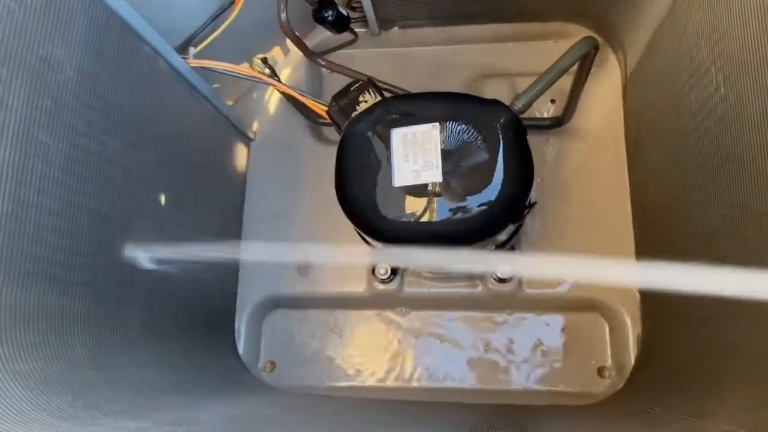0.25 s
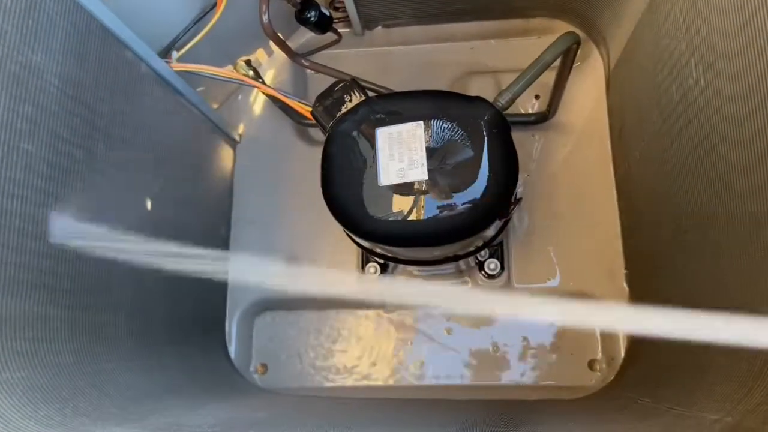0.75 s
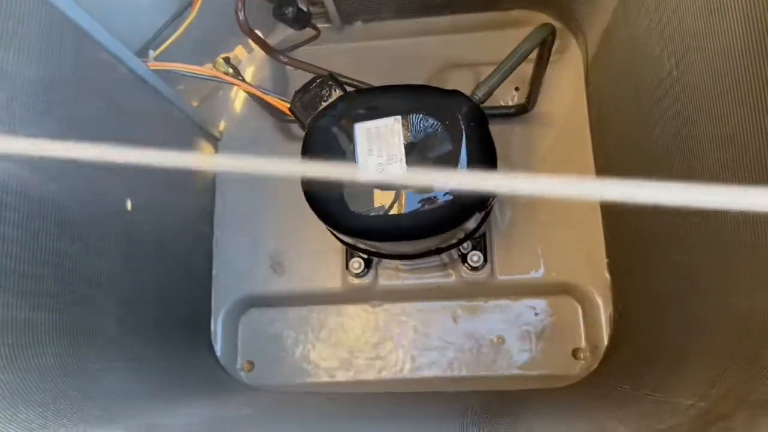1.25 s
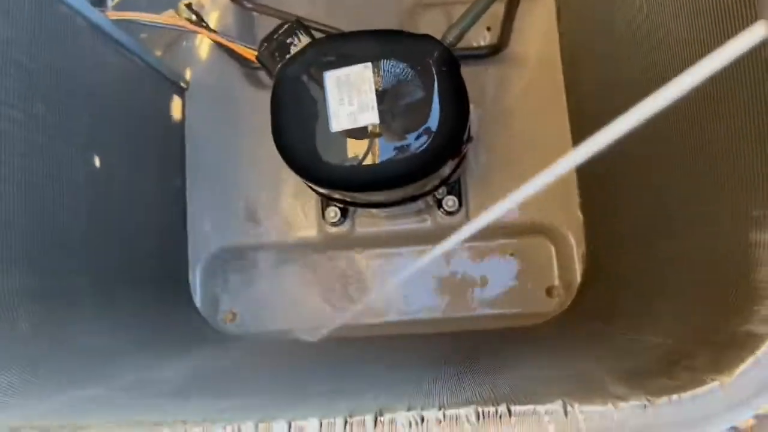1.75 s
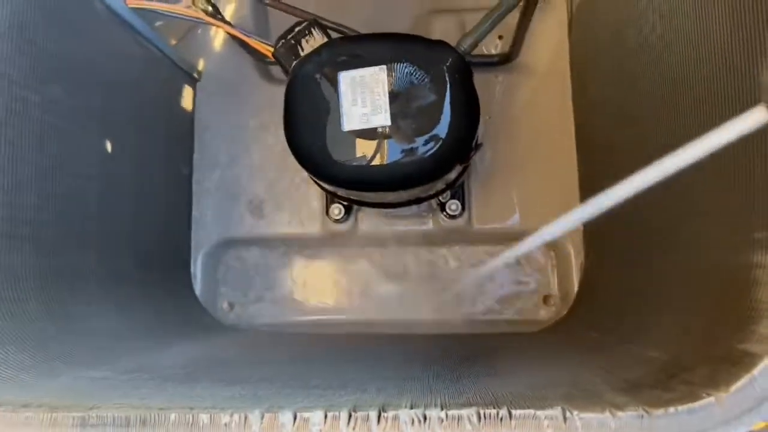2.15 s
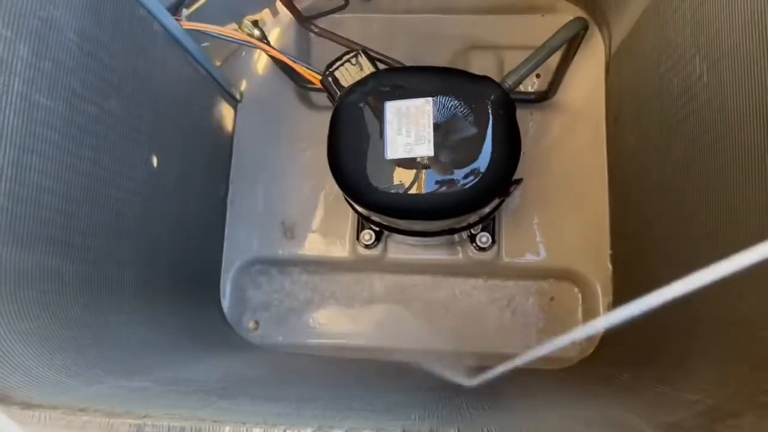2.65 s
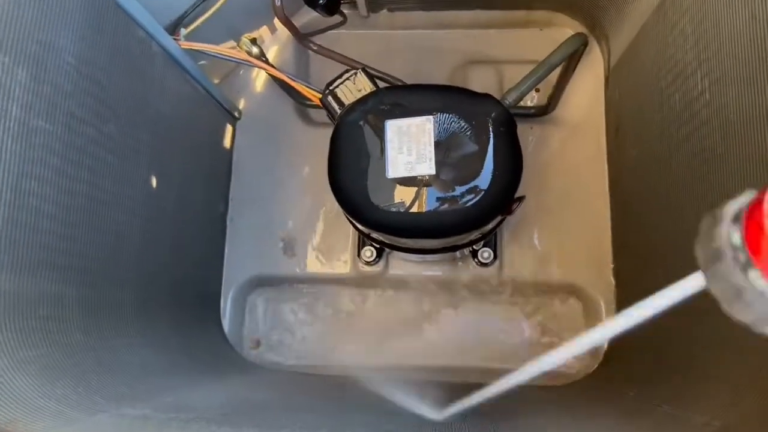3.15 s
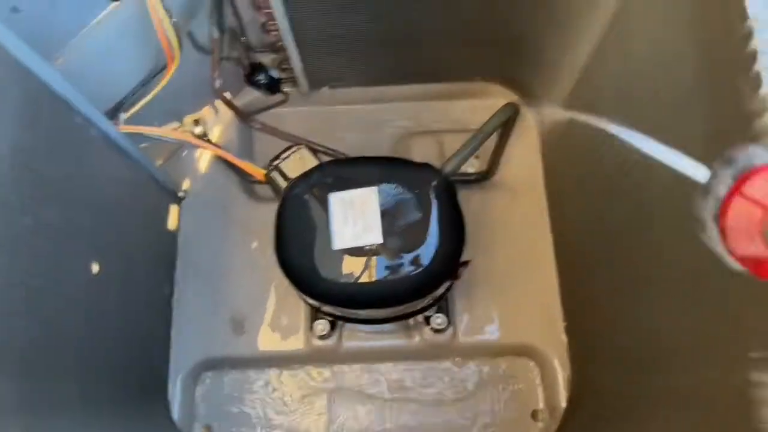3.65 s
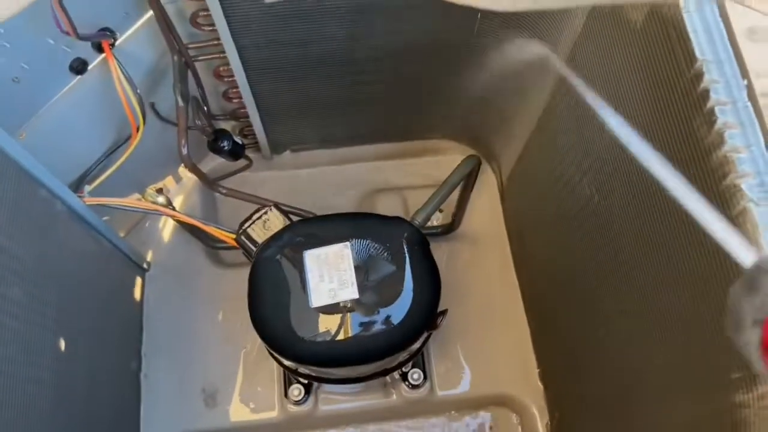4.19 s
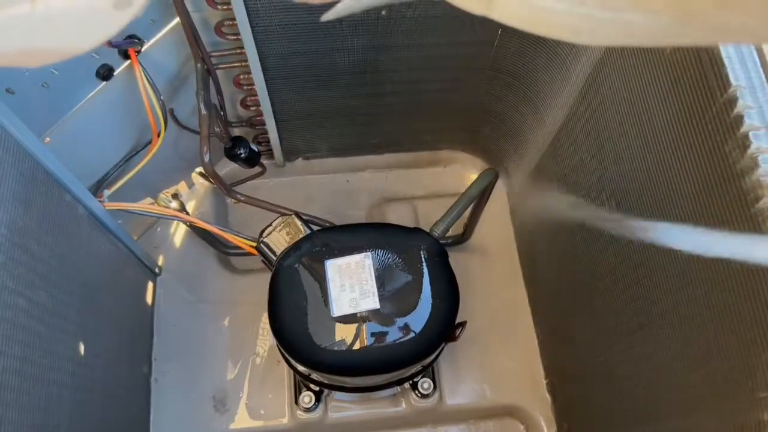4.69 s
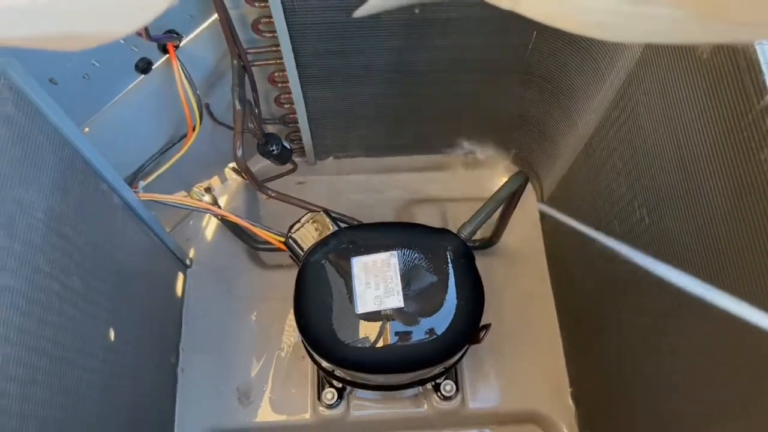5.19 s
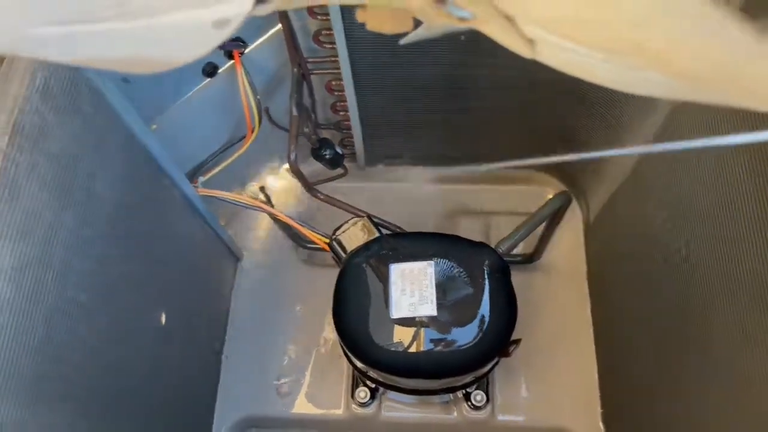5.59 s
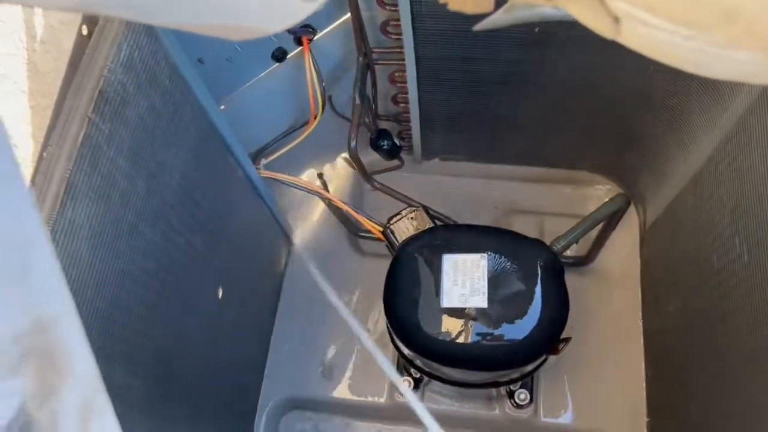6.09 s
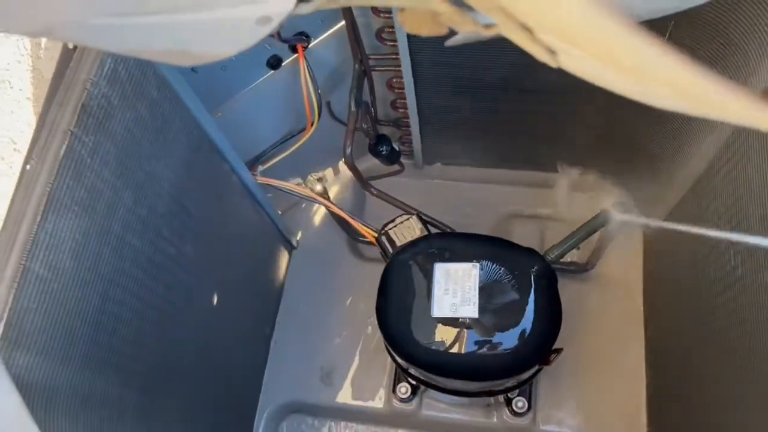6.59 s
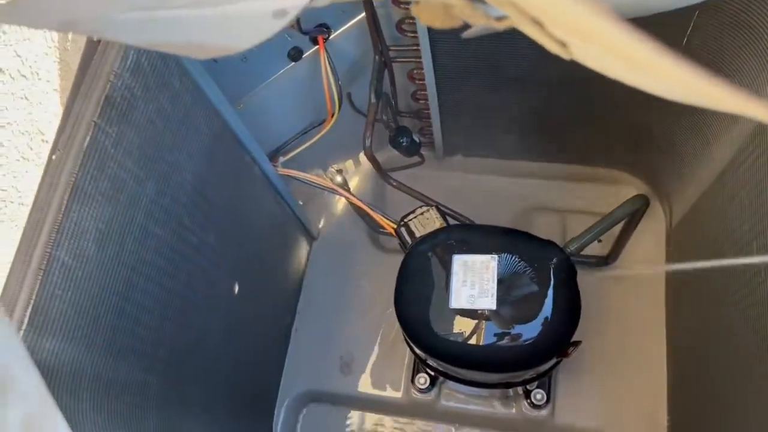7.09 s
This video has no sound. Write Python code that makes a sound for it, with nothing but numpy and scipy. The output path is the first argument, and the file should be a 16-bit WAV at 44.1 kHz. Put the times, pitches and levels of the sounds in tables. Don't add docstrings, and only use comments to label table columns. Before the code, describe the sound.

From 0 to about 1.4 seconds a hose jet sprays thin metal fins close to the microphone: a dense, bright, steady hiss, slightly left, with a lower rush through the gaps. Around 1.5 seconds it drops to a much softer spray, with light flicks against rims near 2.1 and 3.1 seconds and faint whistling resonances. It slowly strengthens from 4 seconds. At 4.9 it strikes solid compressor metal, pipes and pan, becoming much louder, splashy and uneven, with drumming, spatter and very short rings, broken by tiny dropouts near 5.1. After a lull around 5.7, a single low wet knock lands at 5.8. Vigorous sweeping splashes and metallic rings continue, dipping briefly near 6.8 and 7.0, and fade sharply at 7.3. A very faint distant rumble and wavering low hum persist throughout, outdoors.

```python
import sys
import numpy as np
from scipy import signal
from scipy.fft import rfft, irfft, next_fast_len
from scipy.io import wavfile

SR = 44100
rng = np.random.default_rng(int(sys.argv[2]) if len(sys.argv) > 2 else 0)


def output_pcm(signal):
    pcm = np.clip(np.atleast_2d(signal).T, -1, 1) * 32767
    wavfile.write(sys.argv[1], SR, np.round(pcm).astype(np.int16))


def attenuation_scalar(level_db):
    decades = np.asarray(level_db, float) / 20
    return 10 ** decades


N = 323694

# frequency in Hz, level in dB per Hz.
SPLASH_SPECTRUM = [(760, -113), (1300, 2), (1890, 3.5), (2360, 7), (2880, -2), (3560, 4.5), (7480, -11),
                   (10000, -48), (13000, -46), (22000, -120)]
# frequency in Hz, likeness from -1 to 1.
SPRAY_LIKENESS = [(60, 1), (180, 0.99), (550, 1), (1650, 0.29), (4970, 0.37), (15000, 0.25)]
# frequency in Hz, likeness from -1 to 1.
METAL_LIKENESS = [(60, 1.0), (180, 0.73), (550, 1), (1650, 0.34), (4970, 0.53), (15000, 0.03)]


def rms_one(x):
    return x / np.sqrt(np.mean(x ** 2) + 1e-20)


def in_time(rows):
    s, *columns = np.transpose(rows)
    return [np.interp(np.arange(N) / SR, s, c) for c in columns]


def at_hz(points, hz):
    table_hz, value = np.transpose(points)
    return np.interp(np.log(hz), np.log(table_hz), value)


def drift(depth_db, rate):
    r = np.exp(-80 * np.pi * rate / SR)
    slow = signal.lfilter([1], [1, -2 * r, r * r], rng.standard_normal(N // 40 + 2002))
    slow = slow[2000:]
    return np.interp(np.arange(N) / 40, np.arange(len(slow)), attenuation_scalar(depth_db * rms_one(slow)))


def stereo(pair, likeness, hz):
    alike = np.clip(at_hz(likeness, hz), -0.99, 0.99)
    return np.sqrt(1 + alike) * pair[0] + np.sqrt(1 - alike) * pair[1] * [[1], [-1]]


def panned(x, pan_db):
    return x * attenuation_scalar(pan_db / 2 * np.array([[1], [-1]]))


def coloured(source, spectrum, likeness, patchy_db, rate):
    low_hz, top_hz = spectrum[0][0], spectrum[-1][0]
    edges = np.geomspace(low_hz, top_hz, round(3 * np.log2(top_hz / low_hz)) + 1)
    out = 0
    for k, (low, high) in enumerate(zip(edges, edges[1:])):
        band = signal.butter(2, [low, high], "band", fs=SR, output="sos")
        pair = signal.sosfilt(band, source[k % 2])
        hz = np.sqrt(low * high)
        out = out + attenuation_scalar(at_hz(spectrum, hz)) * drift(patchy_db, rate) * stereo(pair, likeness, hz)
    return rms_one(out)


def mode(x, hz, width):
    r = np.exp(-np.pi * width / SR)
    return signal.lfilter([1 - r * r, 0, r * r - 1], [2, -4 * r * np.cos(2 * np.pi * hz / SR), 2 * r * r], x)


def resonant(source, modes, likeness, wander_db, rate):
    out = 0
    for k, (hz, width, db) in enumerate(modes):
        fed = source[k % 2] * (drift(wander_db, rate) * attenuation_scalar(db) / np.sqrt(width))
        out = out + stereo(mode(fed, hz, width), likeness, hz)
    return rms_one(out)


def drops(per_s, spread_db):
    sizes = attenuation_scalar(spread_db * np.minimum(rng.exponential(1, (2, 2, N)), 5)) * rng.standard_normal((2, 2, N))
    return sizes * (rng.random((2, 2, N)) < per_s / SR) + 1e-18


def spurts(per_s, decay_s, size):
    landing = size * np.minimum(rng.exponential(1, N), 2) * (rng.random(N) < per_s / SR)
    return rms_one(1 + signal.lfilter([1], [1, -np.exp(-1 / (decay_s * SR))], landing))


def surroundings():
    # frequency in Hz, level in dB per Hz.
    far_spectrum = [(30, -40), (50, -35), (65, -40), (80, -16), (100, 1), (125, -5.5), (160, 0.5),
                    (200, -6.5), (265, -12), (310, -14.5), (400, -9), (500, -8), (1000, -10.5), (1900, -13)]
    # time in seconds, level in dB.
    far_swell = [
        (0.0, -50),
        (1.9, -52.5),
        (6.03, -48),
        (7.34, -50),
    ]
    # frequency in Hz, width in Hz, level in dB.
    hum_modes = [(119.3, 6.1, 25.1), (262.4, 4.2, 17.2)]
    air = rng.standard_normal((2, 2, N))
    rumble = coloured(air, far_spectrum, SPRAY_LIKENESS, patchy_db=1.47, rate=2.8)
    hum = resonant(air, hum_modes, SPRAY_LIKENESS, wander_db=2.5, rate=1.3)
    return attenuation_scalar(in_time(far_swell)[0]) * (rumble + attenuation_scalar(-7) * hum)


def slap():
    start_s, level_db, top_hz, decay_s = 5.7855, -19, 1800, 0.007
    age = np.arange(N) / SR - start_s
    burst = rng.standard_normal(N) * (age > 0) * np.exp(-np.abs(age) / decay_s) + 1e-18
    knock = signal.sosfilt(signal.butter(2, [340, top_hz], "band", fs=SR, output="sos"), burst)
    return attenuation_scalar(level_db) * knock / np.sqrt(top_hz / SR * 2)


def breaks_db():
    # deepest point in seconds, length in seconds, loss in dB (negative: a brief surge).
    breaks = [(0.044, 0.027, 0.5), (0.15, 0.037, 2), (0.189, 0.019, -0.5), (0.408, 0.021, -2.5),
              (.58, .04, 0.5), (0.615, .03, 0.5), (0.726, .04, -0.5), (.9, .03, -1.5), (0.972, 0.023, -0.5),
              (1.012, .05, 1), (1.25, .03, 0.5), (0.373, 0.062, 2), (0.677, 0.042, 2.5),
              (0.803, 0.044, 3.5), (1.155, 0.028, 4.5), (2.067, .04, 0.5), (2.165, 0.025, -5),
              (2.203, .04, 0), (2.254, 0.015, -4.5), (2.394, 0.052, 3.5), (2.978, 0.062, 3),
              (3.092, 0.051, 6.5), (3.236, 0.04, 6.5), (3.28, 0.063, 6), (3.542, 0.05, 7.5),
              (3.672, 0.033, 2), (3.875, 0.06, 1.5), (4.153, 0.033, 3), (4.572, 0.062, 3.5),
              (4.609, 0.05, 7.5), (4.803, 0.041, 3.5), (4.908, 0.083, 3.5), (5.054, 0.035, 24),
              (5.127, 0.014, 26), (5.282, 0.029, 9), (5.363, 0.015, 9), (5.787, 0.075, 8.5),
              (5.876, 0.092, 7.5), (6.422, 0.14, 8.5), (6.584, 0.098, 6), (6.827, 0.0064, 10),
              (6.856, 0.029, 15), (6.957, 0.041, 3.5), (6.99, 0.02, 11), (7.13, 0.026, 7),
              (7.34, 0.052, 19)]
    snap_back = 0.92
    t = np.arange(0, N + 8, 8) / SR
    loss = 0
    for s, length, loss_db in breaks:
        side_s = np.where(t < s, length, snap_back * length)
        loss = loss + loss_db * np.exp(-(2 * (t - s) / side_s) ** 2)
    return -np.interp(np.arange(N) / SR, t, loss)


def slugs():
    # landing in seconds, gain over the stream.
    landings = [(.177, .3), (.6135, .3), (.6958, 0.27), (.9597, .3), (1.6805, 0.55), (1.729, 0.49),
                (2.4563, 0.61), (3.028, .4), (3.1433, .4), (3.2844, .3), (4.6404, .4), (5.0798, 0.24),
                (5.2225, .4), (5.3163, .3), (5.3841, 0.39), (5.8585, 0.35), (5.9334, 0.19), (6.4422, .3),
                (6.528, .3), (2.1455, 0.88), (2.2383, .5), (2.2518, 0.59), (3.1143, .5), (3.7245, 0.57),
                (4.911, 0.26), (5.1048, 0.29), (5.137, 1.4), (5.233, 0.58), (5.3358, 0.42), (5.43, 0.52),
                (5.604, 0.43), (6.078, 0.3), (6.4059, .15), (6.6059, 0.65), (6.8713, 0.29), (7.0175, 1.2),
                (7.062, 0.32), (7.1726, 0.3), (7.233, 0.34)]
    rise_s, decay_s = 0.0007, 0.006
    s, size = np.transpose(landings)
    hits = np.zeros(N)
    hits[(s * SR).astype(int)] = np.maximum(size, 0)
    rise, decay = np.exp(-1 / (rise_s * SR)), np.exp(-1 / (decay_s * SR))
    return 1 + signal.lfilter([1 - rise], np.convolve([1, -rise], [1, -decay]), hits + 1e-18)


def contacts():
    # start in seconds, dwell in seconds, splash in dB,
    # deep drum in dB over splash, middle drum in dB over splash.
    brushes = [
        (1.005, .19, -45, -14, 0),
        (1.66, .33, -52, -8, 0.5),
        (2.044, 0.013, -37, -19, -5),
        (2.14, 0.045, -40, -17, -0.5),
        (2.239, 0.034, -38.5, -20, 0),
        (3.113, 0.012, -36.5, -35, -7.5),
        (3.5, 0.13, -56, -12, 2.5),
        (3.85, 0.1, -54.5, -15, 4),
        (3.724, 0.015, -33.5, -20, -8),
    ]
    # as for the brushes, in seconds and dB.
    sweep_out = [(4.908, 0.081, -26.5, -22, -4.5), (4.944, 0.1, -26, -10.5, 0.5),
                 (5.062, 0.018, -29.5, 0.5, 2), (5.09, 0.031, -29, -5, 4.5), (5.138, 0.034, -28, -15, -6),
                 (5.18, 0.044, -30.5, -15, 2), (5.224, 0.041, -23, -17.5, -4.5),
                 (5.315, 0.035, -26.5, -18, -3.5), (5.375, 0.054, -28.5, -35, -5),
                 (5.425, 0.053, -33, -10, -0.5), (5.49, 0.068, -29.5, -11, -1),
                 (5.569, 0.072, -27.5, -40, -5.5), (5.66, 0.06, -35.5, -18, -38)]
    # as for the brushes, in seconds and dB.
    sweep_back = [(5.784, 0.042, -17.5, -12.5, -9.5), (5.855, 0.07, -30.5, -17, -5.5),
                  (5.926, 0.085, -22.5, -17, -5.5), (6.02, 0.047, -25.5, -8.5, 0.5),
                  (6.07, 0.033, -23.5, -28, -13), (6.109, 0.05, -23, -10, -9), (6.2, 0.11, -32.5, -9, -15),
                  (6.311, 0.053, -24, -10.5, -7.5), (6.402, 0.044, -25, -36, -11), (6.44, .1, -23, -7, -4),
                  (6.55, 0.025, -26.5, -14, -4), (6.606, .215, -31, -13.5, -2),
                  (6.831, 0.016, -24, -9.5, -2), (6.865, 0.066, -24.5, -6.5, -4.5),
                  (6.954, 0.046, -31, -8, -7.5), (7.019, 0.029, -30.5, -3.5, -2),
                  (7.05, 0.072, -26, -10, -6), (7.163, 0.063, -27.5, -15, -6.5),
                  (7.22, 0.097, -26, -14, -7)]
    attack_s = np.array([[0.006], [0.016], [0.006]])
    release_db_per_s = np.array([[401], [302], [319]])
    out, t = np.zeros((3, N)), np.arange(N) / SR
    for s, dwell, splash_db, deep_db, middle_db in brushes + sweep_out + sweep_back:
        span = slice(int(s * SR), int((s + dwell) * SR) + SR // 4)
        age = t[span] - s
        level_db = splash_db + np.array([[0], [deep_db], [middle_db]])
        level_db = level_db - release_db_per_s * np.maximum(age - dwell, 0)
        swell = np.clip(age / attack_s, 0, 1)
        out[:, span] = np.hypot(out[:, span], swell * attenuation_scalar(level_db))
    return out


def singing():
    # start in seconds, length in seconds, pitch in Hz, level in dB.
    sung_notes = [(1.726, .009, 2500, -38.5), (2.435, 0.052, 2120, -42), (2.965, 0.043, 2110, -44),
                  (3.112, 0.031, 2590, -38), (3.476, 0.032, 485, -46), (3.538, 0.086, 2200, -44.5),
                  (3.72, 0.034, 1340, -44), (3.77, 0.092, 2170, -41.5), (3.905, 0.085, 2240, -40.5),
                  (4.09, 0.04, 2400, -44), (4.22, 0.1, 2050, -46), (4.331, 0.19, 3250, -44.5),
                  (4.947, 0.084, 2200, -29), (4.957, 0.062, 3400, -29.5), (5.077, 0.065, 508, -41),
                   (5.099, 0.034, 940, -32), (5.217, 0.046, 2260, -25), (5.334, 0.022, 4650, -29),
                   (5.33, 0.047, 1290, -38.5), (5.577, 0.09, 3120, -39), (5.783, 0.043, 1270, -25),
                   (5.786, 0.032, 474, -31), (5.788, 0.049, 2300, -43), (5.793, 0.12, 3630, -32.5),
                   (5.929, 0.12, 3490, -29), (5.94, 0.083, 492, -29.5), (5.954, 0.048, 850, -28),
                   (5.978, 0.064, 4600, -30), (6.035, 0.03, 780, -31), (6.125, 0.04, 1400, -30.5),
                   (6.147, 0.048, 512, -27.5), (6.318, 0.029, 2250, -32), (6.325, 0.087, 286, -48),
                   (6.317, 0.045, 910, -31), (6.456, 0.053, 1290, -29), (6.524, 0.018, 3500, -30),
                   (6.865, 0.055, 2300, -26.5), (6.867, 0.076, 1360, -37), (6.902, 0.033, 5730, -33),
                   (7.174, 0.016, 5700, -26), (7.214, 0.061, 2370, -35), (7.215, 0.068, 4040, -29),
                  (1.634, 0.027, 1500, -53),
        (3.484, .028, 380, -49),
        (5.426, 0.025, 4200, -31.5),
        (6.2, .12, 493, -53),
        (6.47, 0.081, 385, -40.5),
        (6.615, 0.096, 1210, -37),
        (6.729, 0.059, 1900, -36),
        (6.867, 0.051, 387, -41.5),
        (7.121, 0.025, 676, -35),
                  (4.982, .046, 3200, -30), (5.091, 0.017, 526, -37), (5.11, 0.017, 560, -30),
             (5.138, .016, 537, -36), (5.139, 0.017, 1780, -29.5), (5.155, .04, 3020, -36),
             (5.215, .03, 3500, -30), (5.235, .035, 2940, -39), (5.331, 0.036, 2550, -31.5),
             (5.379, 0.022, 5430, -32.5), (5.411, .03, 1260, -32.5), (5.438, 0.032, 2090, -32.5),
             (5.46, 0.057, 506, -47), (5.557, 0.035, 2120, -35), (5.601, 0.022, 4230, -28.5),
             (5.61, 0.039, 3230, -40), (5.668, .015, 447, -46), (5.697, .03, 520, -52),
             (5.797, .03, 2900, -42), (6.066, .035, 880, -25.5), (6.074, 0.023, 3970, -29),
             (6.19, 0.034, 2110, -40), (6.24, .032, 2300, -36), (6.33, 0.052, 3870, -33),
             (6.35, 0.021, 2170, -27.5), (6.403, .022, 3870, -37), (6.404, .03, 2300, -33.5),
             (6.442, 0.049, 3500, -31), (6.445, 0.034, 2410, -29), (6.49, .06, 510, -38),
             (6.514, 0.031, 4280, -32), (6.535, 0.031, 2250, -28), (6.617, 0.033, 2190, -32.5),
             (6.614, .04, 4260, -37), (6.768, 0.023, 2000, -37), (6.833, 0.019, 3720, -33.5),
             (6.873, 0.055, 3586, -31.5), (6.895, .03, 522, -38), (6.916, 0.015, 1300, -28),
             (7.046, .028, 4200, -28.5), (7.062, .05, 2440, -33), (7.172, .024, 3880, -31),
             (7.186, 0.05, 2250, -31.5), (7.231, 0.019, 2410, -21.5), (7.26, .066, 3500, -39),
             (7.263, .05, 677, -38),
                  (1.015, .06, 690, -54), (1.08, 0.055, 793, -52), (1.146, .06, 715, -55.5),
                   (1.635, 0.04, 764, -54), (1.68, 0.0071, 3300, -44), (2.059, 0.039, 835, -50.5),
                   (2.06, 0.014, 1350, -48), (2.138, 0.018, 2670, -39), (2.154, 0.064, 890, -51),
                   (2.166, 0.022, 2660, -39), (2.237, 0.063, 820, -47), (2.25, 0.033, 2630, -40),
                   (2.689, 0.057, 2130, -47), (3.033, .038, 2410, -48), (3.121, 0.033, 917, -49),
                   (3.157, 0.065, 2330, -47), (3.547, 0.087, 1820, -49), (3.588, .066, 2680, -48),
                   (4.305, 0.092, 2520, -43), (4.418, 0.084, 2430, -42), (4.298, 0.094, 3320, -45),
                   (4.449, .026, 3480, -38.5), (4.55, .1, 510, -61), (4.704, 0.043, 530, -53),
                   (0.973, .04, 2100, -36), (1.02, .12, 1700, -45), (1.253, 0.056, 1710, -50),
                   (1.413, 0.053, 2030, -40), (1.521, 0.07, 1950, -45), (1.688, .08, 2120, -54),
                   (1.85, 0.05, 2110, -50.5),
                  (4.935, .06, 5260, -33), (5.0, 0.039, 1940, -29), (5.005, 0.026, 3440, -34),
              (5.02, 0.021, 610, -37), (5.155, 0.013, 5400, -37), (5.186, .018, 5450, -34),
              (5.22, 0.022, 5400, -31), (5.975, .035, 730, -28.5), (5.99, 0.027, 595, -32),
              (6.062, 0.043, 730, -34), (6.13, 0.057, 856, -36.5), (6.33, 0.042, 504, -33),
              (6.355, 0.028, 823, -37), (6.875, .04, 4570, -30), (6.885, 0.013, 1050, -28),
              (6.98, 0.035, 5800, -33), (6.892, 0.023, 2350, -28), (7.235, 0.055, 3000, -36),
              (7.28, .02, 3900, -35), (7.28, .015, 5500, -32)]
    # frequency in Hz, left over right in dB.
    note_pan = [(400, -3), (700, -1.5), (1300, 1), (2400, 4), (4400, 0.5)]
    dry_below_hz = 1200
    notes = sung_notes
    out, water = np.zeros((2, N)), rng.standard_normal((len(notes), 2, 8192))
    for pair, (s, length, hz, db) in zip(water, notes):
        width = 11.7 + 0.097 * hz * min(hz / dry_below_hz, 1)
        rung = mode(mode(pair * [[1], [0.7]], hz, width), hz, width)
        tone = stereo(rung, METAL_LIKENESS, hz)
        at = round(s * SR)
        count = min(round(1.3 * length * SR), N - at, 7000)
        swell = np.sin(np.pi * np.linspace(0, 1, count) ** 0.42)
        swell = swell * np.minimum(np.arange(count) * hz / SR / 2, 1)
        envelope = np.abs(signal.hilbert(tone.mean(axis=0)))[-count:]
        tone = tone[:, -count:] / (envelope + 1.2 * tone.std()) ** 0.44
        out[:, at:at + count] += attenuation_scalar(db) * panned(rms_one(swell * tone), at_hz(note_pan, hz))
    return out


def panel_modes(low_hz, high_hz, loss, count):
    pitches = np.geomspace(low_hz, high_hz, count) * (1 + 0.052 * rng.standard_normal(count))
    return [(hz, loss * hz, at_hz(SPLASH_SPECTRUM, hz) + 20 * np.log10(hz / low_hz)) for hz in pitches]


def drumming(splash, deep, middle, loss_db):
    # time in seconds, ring over splash in dB.
    solidity = [
        (0, -7),
        (4.0, 9),
        (4.9, 0),
        (7.34, 6),
    ]
    # frequency in Hz, width in Hz, level in dB.
    shell_modes = [(2250, 22, 6), (3085, 32, 3), (3640, 25, -2.5), (4200, 60, -18), (4560, 76, 5),
                   (5170, 65, 1.5)]
    # frequency in Hz, width in Hz, level in dB.
    deep_modes = [(391, 39, -5), (514, 22, 10), (495, 72, 3)]
    # frequency in Hz, width in Hz, level in dB.
    middle_modes = [(748, 15, 2), (963, 52, 4.5), (985, 36, -21), (1290, 134, 9.5), (1512, 140, 6)]
    # frequency in Hz, level in dB per Hz.
    thud_spectrum = [(300, -54), (450, -36), (700, 10), (1000, 1.5), (1400, 8.5), (1900, 6)]
    ring = attenuation_scalar(in_time(solidity)[0])
    heavy = drops(7000, spread_db=0.5) * spurts(90, decay_s=0.0043, size=0.3)

    spatter = coloured(heavy, SPLASH_SPECTRUM, METAL_LIKENESS, patchy_db=4.0, rate=10)
    sheet_modes = panel_modes(1475, 7320, loss=0.075, count=18)
    sheet = resonant(heavy, sheet_modes, METAL_LIKENESS, wander_db=4.0, rate=40)
    shell = resonant(heavy, shell_modes, METAL_LIKENESS, wander_db=5.5, rate=9)
    bright = attenuation_scalar(-5) * spatter + attenuation_scalar(-1.5) * sheet + ring * attenuation_scalar(-12) * shell
    bright = signal.sosfilt(signal.butter(3, 1500, "high", fs=SR, output="sos"), bright)

    low = deep * resonant(heavy, deep_modes, METAL_LIKENESS, wander_db=4.0, rate=8.2)
    low = signal.sosfilt(signal.butter(3, [330, 700], "band", fs=SR, output="sos"), low)

    thud = coloured(heavy, thud_spectrum, METAL_LIKENESS, patchy_db=2.5, rate=14)
    body = resonant(heavy, middle_modes, METAL_LIKENESS, wander_db=3.0, rate=32)
    mid = middle * (attenuation_scalar(-3.0) * thud + ring * attenuation_scalar(-5.5) * body)
    mid = signal.sosfilt(signal.butter(2, 550, "high", fs=SR, output="sos"), mid)

    out = panned(attenuation_scalar(0.29 * loss_db) * splash * bright, 1.4)
    out = out + panned(attenuation_scalar(0.22 * loss_db) * mid, -0.29)
    return out + panned(low, -1.4) + singing()


def pings():
    per_s, ring_cycles = 500, 51
    sizes = attenuation_scalar(1.5 * np.minimum(rng.exponential(1, (2, N)), 4))
    born = (rng.random((2, N)) < per_s / SR) * sizes + 1e-18
    dealt = rng.integers(0, 16, (2, N))
    out = 0
    for k, hz in enumerate(np.geomspace(2800, 14000, num=16)):
        out = out + stereo(mode(born * (dealt == k), hz, hz / ring_cycles), SPRAY_LIKENESS, hz)
    return rms_one(out)


def spray(splash, loss_db):
    # time in seconds, force in dB, share driven between the fins in dB,
    # how squarely it meets the gaps in dB.
    jet = [(0.0, -21, -4.5, -7.5), (0.92, -23, -6, -6), (1.27, -23, -6, -17.5), (1.52, -32, -8.5, 6),
           (1.62, -39, -9, -4), (2.0, -37, -10, -10), (2.35, -33, -10, -4), (2.47, -30, -14.5, -0.5),
           (2.8, -30.5, -10.5, -4), (3.3, -31.5, -10, -3.5), (3.47, -29.5, -13.5, -1.5), (3.6, -33, -7, -5),
           (4.05, -30, -7.5, 0), (4.45, -27.5, -11.5, -2.5), (4.88, -26, -12, -0.5),
           (4.95, -28.5, 2.5, 5.5), (6.0, -31.5, -52, -5), (7.34, -30.5, -12, 17.5)]
    # time in seconds, left over right in dB.
    aim = [(0.0, 5.5), (1.2, 5), (1.45, 5), (1.76, 7.5), (2.19, 2), (2.74, 2), (2.98, 1.5), (3.17, 4.5),
           (3.43, 2.5), (3.84, 2.5), (4.58, 2.5), (5.36, 1), (6.38, 6), (6.64, 3.5), (7.34, 3.5)]
    # frequency in Hz, level in dB per Hz.
    mist_spectrum = [(4000, -29), (5500, -4), (6800, -2.5), (8670, -1), (10000, 0), (11300, 4), (13000, -2),
                     (18000, -8.5)]
    # frequency in Hz, level in dB per Hz.
    slot_spectrum = [(500, -24.5), (900, -20.5), (1290, -32), (1670, -55), (2100, -5.5), (2570, -8),
                     (3670, -2), (6420, -4.5), (9000, -14)]
    # frequency in Hz, width in Hz, level in dB.
    gap_modes = [(1900, 290, -14), (2105, 58, -3.5), (2200, 35, -5.5), (2398, 215, -3)]
    t = np.arange(N) / SR
    force_db, share_db, square_db = in_time(jet)
    pan_db, = in_time(aim)
    rush_db = force_db + share_db
    thrown_up = attenuation_scalar(-40) * splash
    hiss = attenuation_scalar(loss_db) * np.hypot(attenuation_scalar(force_db), thrown_up)
    fine = drops(30000, spread_db=-1.0) * spurts(90, decay_s=0.0039, size=0.2)

    flutter = attenuation_scalar(1.4 * loss_db)
    trickle = attenuation_scalar(-55)
    rush = coloured(fine, slot_spectrum, SPRAY_LIKENESS, patchy_db=2.0, rate=27)
    rush = (attenuation_scalar(rush_db) * flutter + trickle) * rush
    gaps = resonant(fine, gap_modes, SPRAY_LIKENESS, wander_db=5.0, rate=9.3)
    rush = rush + attenuation_scalar(rush_db + square_db) * flutter * gaps

    mist = coloured(fine, mist_spectrum, SPRAY_LIKENESS, patchy_db=2.0, rate=14.6)
    finest = signal.sosfiltfilt(signal.butter(3, 13000, "high", fs=SR, output="sos"), mist)
    finest_db = 0.5 + 0.84 * pan_db + 4 * (t > 4.7)
    mist = mist + (attenuation_scalar(finest_db) - 1) * finest
    thinned = np.clip((1.67 - t) / 0.35, 0, 1) * mode(mist, 6930, 1140)
    mist = mist - 0.11 * thinned - 0.21 * thinned.mean(axis=0)

    droplets = attenuation_scalar(-12.5) * np.hypot(hiss, attenuation_scalar(-2.0) * splash) * pings()
    return panned(hiss * mist + droplets, pan_db) + panned(rush, 0.4 * pan_db)


def scene():
    # return in seconds, choking in seconds, loss in dB.
    cut_offs = [
        (5.1385, .008, 4),
        (5.7855, .012, 8),
        (7.0172, .018, 6),
    ]
    lift, loss_db, t = slugs(), breaks_db(), np.arange(N) / SR
    splash, deep, middle = contacts()
    choke_db = 0
    for s, length, db in cut_offs:
        choke_db = choke_db + db * (t < s) * np.exp(-((s - t) / length) ** 2)
    water = lift * spray(splash, loss_db) + drumming(lift * splash, deep, lift * middle, loss_db)
    return attenuation_scalar(-choke_db) * water + slap() + surroundings()


def top_cut(x):
    return signal.sosfilt(signal.butter(12, 15760, fs=SR, output="sos"), x)


def record(dry):
    # frequency in Hz, turn in radians.
    port_turn = [(500, 0), (1500, -0.68), (2700, -0.29), (4000, .4), (6500, -1), (9000, -0.24),
                 (15000, -.4)]
    size = next_fast_len(N + 2048)
    hz = np.maximum(np.fft.rfftfreq(size, 1 / SR), 1)
    right = irfft(rfft(dry[1], size) * np.exp(1j * at_hz(port_turn, hz)), size)[:N]
    heard = signal.sosfilt(signal.cheby2(16, 50, 16450, fs=SR, output="sos"), [dry[0], right])
    return top_cut(heard)


dry = scene()
out = record(dry)
output_pcm(out)
```